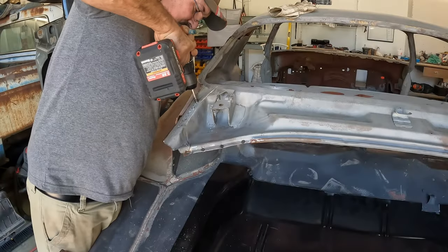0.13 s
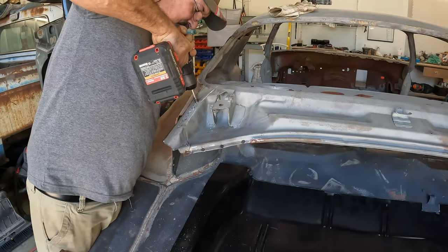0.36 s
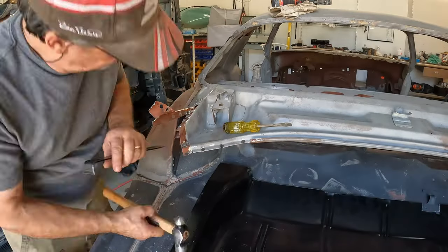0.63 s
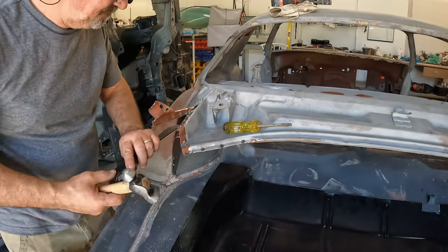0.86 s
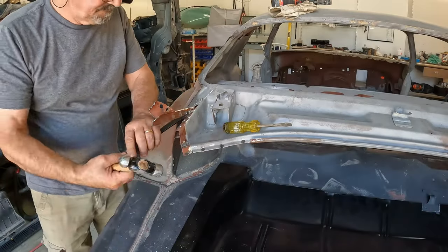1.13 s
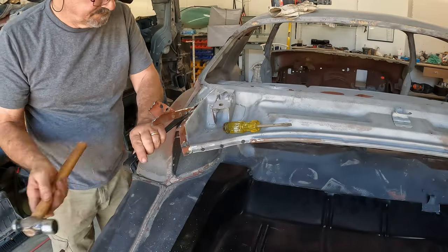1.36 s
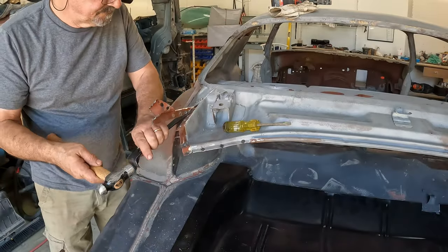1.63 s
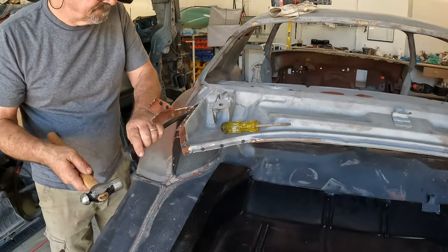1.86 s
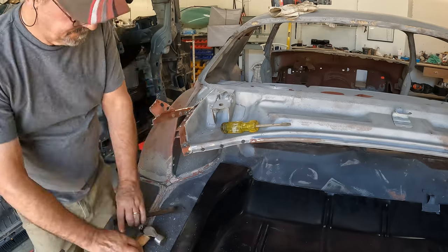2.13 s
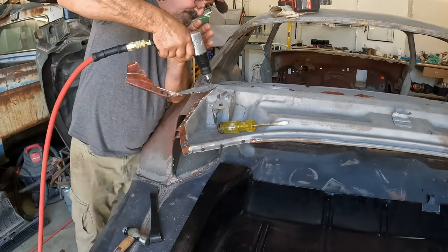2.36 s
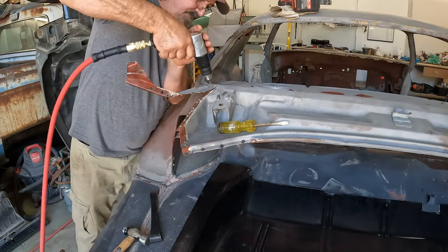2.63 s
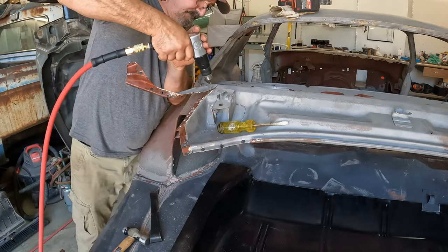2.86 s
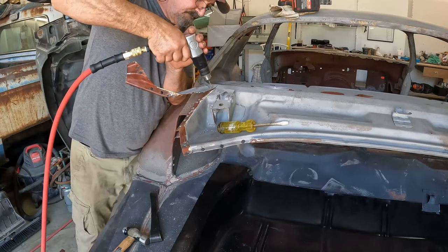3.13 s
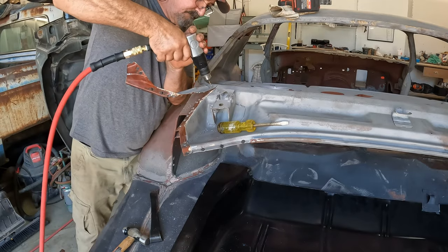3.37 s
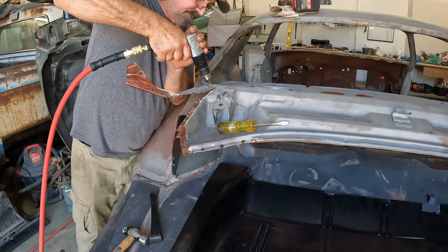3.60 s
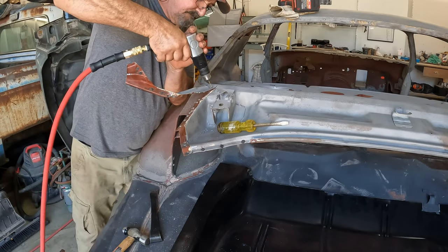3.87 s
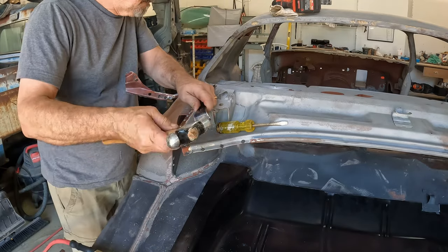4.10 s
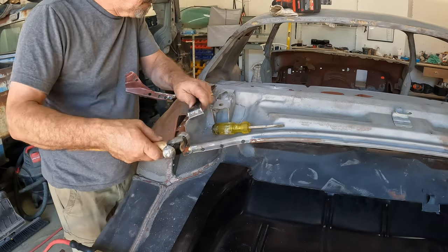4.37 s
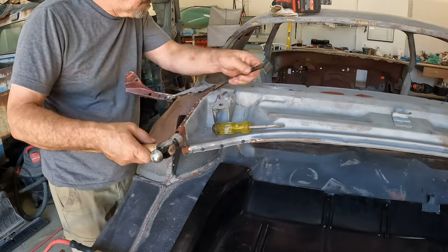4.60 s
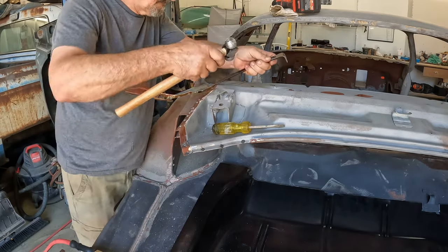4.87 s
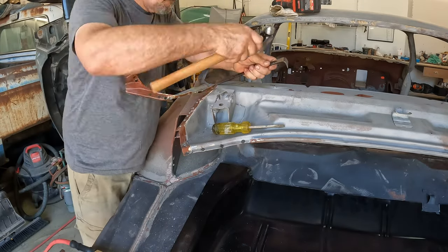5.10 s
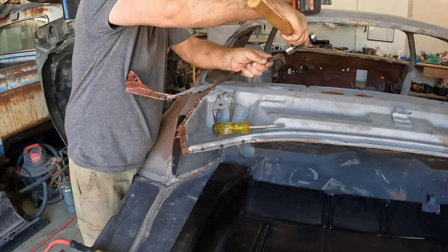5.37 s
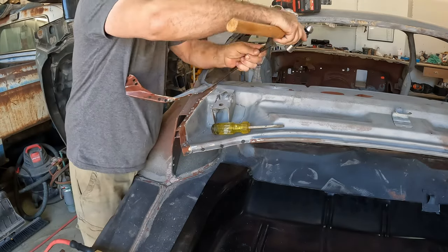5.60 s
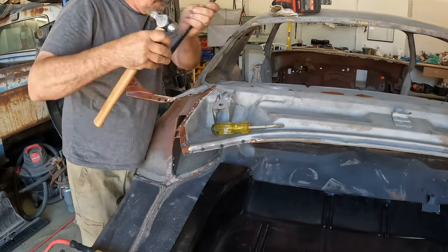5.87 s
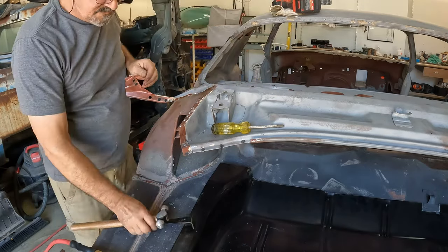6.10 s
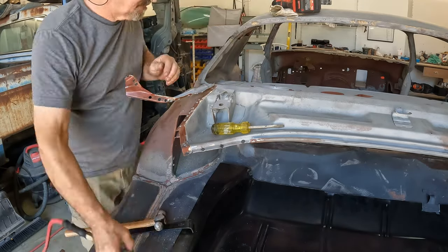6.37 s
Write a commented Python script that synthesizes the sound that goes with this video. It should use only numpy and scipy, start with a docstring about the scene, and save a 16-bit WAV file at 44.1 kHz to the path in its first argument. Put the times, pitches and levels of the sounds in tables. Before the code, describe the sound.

In a home garage, a cordless drill already boring sheet steel whines steadily over a rumbling panel for half a second. It cuts abruptly to irregular hammer blows on a chisel, sharp, clanking and briefly ringing, with small scrapes. An air drill then pops, spins up and whines with rushing exhaust, before the hammer returns in quick runs. Close microphone, nearly mono, hissy background.

```python
"""A cordless drill bores sheet steel: gear whine and shaft tones over a rumbling panel and motor hiss.
Then a hammer drives a chisel into a seam of a bare car body: cracks, dense and strong ringing modes,
clinks, thuds and scrapes. An air drill pops, spins up and whines on vane tones and exhaust rush, and
the hammer returns with quick runs of blows. These four joined passages sit in a garage, over noise that is
hissy behind the hammer, duller behind the air drill; all is near mono, with a faint flickering side."""
import sys
import numpy as np
from scipy import signal
from scipy.fft import rfft, irfft, next_fast_len
from scipy.io import wavfile
from scipy.ndimage import map_coordinates

SR = 44100
rng = np.random.default_rng(int(sys.argv[2]) if len(sys.argv) > 2 else 0)


def invert_db(level):
    """Linear amplitude ratio for a level in decibels (20 dB per decade), elementwise."""
    return 10 ** (np.asarray(level, dtype=float) / 20)


def file_out(sig):
    """Save sig as 16-bit WAV at sys.argv[1]."""
    # one column per channel
    cols = np.atleast_2d(sig).T
    # limit, then scale
    lim = np.clip(cols, -1, 1)
    pcm = np.round(lim * 32767).astype(np.int16)
    wavfile.write(sys.argv[1], SR, pcm)


N = 285768  # length in samples

# Hammer blows: t/s, level/dB, boom/dB, treble/dB, f/Hz that the struck spot favours
BLOWS = [(0.639, -7.5, -3, -7, 1746), (0.659, -14, -8.5, -6.5, 2000), (0.679, -14, -12, -1, 1600),
         (0.781, -15, -8.5, 8.5, 5300), (0.884, -15, -20, -12, 2400), (0.895, -21, -30, -18, 2410),
         (0.953, -22, -16, -3, 2400), (0.999, -34, 6, 0, 1900), (1.045, -40, -15, 0, 1360),
         (1.073, -31, -17.5, 0, 2010), (1.079, -11.5, -6.5, 2, 2436), (1.173, -28, -10, 8, 5100),
         (1.235, -35, -9, -3, 1400), (1.382, -13, -20.5, 4, 2340), (1.469, -8.5, -8, -1.5, 3340),
         (1.609, -10.5, -9.5, -2.5, 1776), (1.693, -9, 1, 0.5, 3240), (1.738, -20, -9, 12, 905),
         (1.907, -7, -3, -2.5, 3200), (1.971, -24, -10, -1.5, 2000), (2.029, -36.5, 1, 3.5, 820),
         (2.06, -24, -21, -9.5, 3240), (2.112, -5.5, -4.5, -16, 976), (2.149, -18, 0.5, -0.5, 1004),
         (2.2, -6, -17, -9.5, 4410), (2.244, -14.5, -12.5, -9.5, 2350), (4.133, -12, 3.5, 1.5, 1715),
         (4.203, -7.5, -4.5, 0.5, 1690), (4.271, -5.5, -7.5, -4.5, 1787), (4.337, -7, -5, -2, 1736),
         (4.835, -19.5, -17, 4, 5100), (4.921, -13.5, -15, -6, 2350), (4.954, -11.5, -24, -16.5, 2350),
         (4.988, -22, -22, 12.5, 5300), (5.024, -17, -21, -3.5, 2745), (5.067, -20.5, -21, 0, 2120),
         (5.091, -12.5, -21, -9.5, 3080), (5.113, -28, -6.5, -7, 3110), (5.149, -40, 6, 9, 644),
         (5.203, -42, -8, 7.5, 733), (5.307, -14.5, -15, 8, 2400), (5.375, -14, -2.5, 8.5, 5250),
         (5.438, -11, -7, 5.5, 2570), (5.488, -13, -3, 6.5, 2500), (5.541, -11.5, -1, 5, 1770),
         (5.592, -7.5, -6, 0, 1740), (5.645, -10, -1, 2, 1700), (5.845, -45, 6.5, 3, 618),
         (6.014, -42, -31, 12.5, 2580), (6.039, -49, 5, -1, 649), (6.063, -38, -17.5, 19.5, 5300),
         (6.153, -14, -3, 6, 5600), (6.179, -9.5, -7.5, -12, 1140), (6.201, -11, -5.5, 2.5, 2310)]
# Strong modes of the panel: f/Hz, relative level/dB, t60/s before each blow's stretch
PANEL_MODES = [(448, -8, .3), (487, -6.5, 0.45), (705, -0.5, 0.4), (909, 2.5, 0.25), (1058, 3.5, 0.28),
               (1280, -17, .25), (1510, -12, 0.18), (1740, -3, .32), (1790, -17, 0.22), (2123, 4.5, 0.21),
               (2377, 1.5, 0.16), (2530, -0.5, 0.18), (2770, -4, 0.2), (3080, -7.5, 0.2), (3350, -16, 0.22),
               (4170, -8, .18), (5400, -3.5, .12)]
# Colour of the sheet's dense small modes: f/Hz, relative level/dB
SHEET_COLOUR = [(150, -42), (350, -29), (600, -1), (1500, 2), (3000, -5), (6000, -8.5), (10000, -9.5),
                (15500, -16), (16500, -32.5)]
# Decay of those dense modes: f/Hz, t60/s before each blow's stretch
SHEET_DECAY = [(200, 0.61), (530, 0.2), (1400, 0.27), (3700, 0.19), (9700, 0.12), (15000, 0.1)]
# Chisel ringing free: t/s, level/dB, f/Hz of the mode the grip leaves loudest
CLINKS = [(1.083, -46, 4500), (1.47, -46, 7200), (1.74, -44, 6480), (2.061, -43.5, 3350),
          (4.99, -46, 10400), (5.089, -42, 3350), (5.205, -54, 10400), (5.644, -54, 6480),
          (5.927, -56, 7200), (6.2, -51, 8800)]
# Modes of the chisel: f/Hz, relative level/dB, t60/s before the clink's shortening
CHISEL_MODES = [(3350, 0, .2), (4500, -3, .2), (6480, -4, .5), (7200, 0, .2), (8800, -5, .3),
                (10400, -3, .25), (12300, -4, .15), (15600, -4, .15)]
# Blows that make the whole body lurch: t/s, level/dB
THUDS = [(0.639, -52), (1.079, -53), (1.382, -56), (1.469, -36), (1.693, -43), (1.907, -46), (2.112, -54),
         (4.133, -44), (4.203, -43), (4.271, -46), (4.337, -48), (5.375, -48), (5.438, -44), (5.488, -46),
         (5.645, -51), (6.153, -56)]
# Steel dragged on steel: start t/s, length/s, level/dB
SCRAPES = [(0.625, .015, -30), (1.13, .04, -38), (4.43, .06, -48), (4.54, .025, -41), (4.66, .07, -31),
           (4.94, .17, -35), (5.97, .045, -50), (6.42, .02, -43)]
# Cordless drill's speed as the bit catches and frees: t/s, shaft f/Hz
DRILL_SPEED = [(0.0, 113.5), (0.066, 116.6), (0.132, 113.8), (0.33, 111.6), (0.382, 113.8), (0.494, 111.4),
               (0.54, 113)]
# Cordless drill's shaft tones: multiple of shaft, level/dB beside the whine
DRILL_ORDERS = [(2, -10), (3, -9), (6, -3.5), (12, -12), (24, -10.5), (30, -20), (96, -29.5), (118, -55)]
# Panel under the drill bit: f/Hz, width/Hz, relative level/dB
DRILL_PANEL = [(215, 64, -0.5), (415, 65, 2.5), (486, 43, 6.5), (573, 72, -7.5), (727, 77, 1.5),
               (1130, 100, -9)]
# Colour of the motor's hiss: f/Hz, relative level/dB per Hz
DRILL_HISS = [(35, -59), (60, -26), (209, -8.5), (551, -4.5), (679, 1), (1210, -16), (1360, -10.5),
              (2470, -15), (3580, -4.5), (3930, -11), (7500, -27.5), (9020, -46), (11100, -38),
              (15000, -96)]
# Air drill's rotor overshoots and sags under load:
# t/s, first vane tone f/Hz at full speed, second and third vane tone level/dB before surge and chatter
AIR_SPEED = [(2.65, 1136, -13, -19), (2.71, 1106, -14, -19), (2.74, 1094, -15, -14), (2.8, 1075, -17, -15),
             (2.9, 1057, -18.5, -14), (2.96, 1046, -18, -13), (3.04, 1035, -18, -15.5),
             (3.27, 1021, -21, -16), (3.57, 1010, -23, -16), (3.75, 1010, -21, -18),
             (3.8, 1020, -21, -15.5), (4.075, 1023, -17.5, -17)]
# Air drill's shaft tones: multiple of shaft, level/dB beside their shared level
AIR_ORDERS = [(1, -24.5), (2.5, -20), (3.5, -17.5), (7, -14.5), (11, -11), (12, -34), (13, -22), (14, -19),
              (16, -10), (18, -30), (19, -14), (20, -7.5), (25, -14.5), (27, -17), (29, -13), (55, -34)]
# Panel under the air drill: f/Hz, width/Hz, relative level/dB
AIR_PANEL = [(102.6, 8.3, -12.5), (238, 74, -14), (500, 49, 0), (615, 194, -2.5), (1356, 123, -6)]
# Colour of the exhaust rush: f/Hz, relative level/dB per Hz
EXHAUST_COLOUR = [(35, -72), (60, -39), (438, -16.5), (551, -21), (938, -16), (1030, -5), (1600, -18.5),
                  (2060, -13.5), (2470, -9.5), (3120, -4.5), (3420, -12), (5950, -14.5), (8820, -29),
                  (11400, -26.5), (15000, -60.5)]
# Colour of the garage noise behind the hammer: f/Hz, relative level/dB per Hz
GARAGE_COLOUR = [(35, -45), (60, -30.5), (202, -8.5), (1060, 8.5), (1220, 3), (1910, 2), (2900, -5.5),
                 (3190, -0.5), (3420, -4), (4320, -9), (16000, -15)]
# Loudness of that garage noise: t/s, level/dB
GARAGE_LEVEL = [(.55, -46.5), (1.35, -45), (1.9, -49), (2.44, -47), (4.5, -48), (5.3, -47.5), (5.8, -54),
                (6.12, -52), (6.48, -46)]
# Colour of the duller noise behind the air drill: f/Hz, relative level/dB per Hz
DULL_COLOUR = [(18, -50), (30, -44), (82, -17), (334, 5), (414, -20.5), (592, -4), (652, -19), (4840, -31),
               (9000, -72), (11700, -101), (19800, -120)]
# Faint residue in the side: f/Hz, level/dB beside mid before a small lift and quick flicker
SIDE_RESIDUE = [(40, -26), (80, -18), (150, -27), (380, -29), (950, -36), (2380, -41), (5980, -26),
                (15000, -17)]

DRILL_END_S, AIR_SCENE_S, AIR_START_S, AIR_STOP_S = 0.541, 2.443, 2.584, 4.077


def hammer():
    """Blows on chisel and panel, loose chisel rings and body lurches, each a decaying sound set in time."""
    out, t = np.zeros(N + SR), np.arange(SR // 2) / SR
    comb = ripple(0.0099)  # fine peaks of the sheet, alike for all blows
    for s, db, boom_db, treble_db, spot_hz in BLOWS:
        stretch = max(1.47 + .02 * db + .018 * boom_db, .1)  # harder and deeper blows ring longer
        place(out, s, invert_db(db) * blow(boom_db, treble_db, stretch, spot_hz, comb))
    for s, db, free_hz in CLINKS:
        modes = [(f, level + 9 * (abs(f / free_hz - 1) < .06), t60) for f, level, t60 in CHISEL_MODES]
        place(out, s, invert_db(db) * ring(modes, 0.6, t))
    bass_cut = signal.butter(4, 220, "high", fs=SR, output="sos")  # the blows carry no deep bass
    out = signal.sosfilt(bass_cut, out)
    lurch = np.sin(2 * np.pi * 60 * t) * np.exp(-t / .009)
    for s, db in THUDS:
        place(out, s, invert_db(db) * lurch)
    wall = np.pad(out, (round(.014 * SR), 0))  # the nearest wall answers once
    return out[:N] + invert_db(-11) * wall[:N]


def blow(boom_db, treble_db, stretch, spot_hz, comb):
    """Contact click, crack, dense modes dying band by band, and strong modes loudest near the spot's pitch."""
    size = SR // 2

    def colour(f):
        spot_db = 7 * np.exp(-(np.log(f / spot_hz + 1e-9) / 0.064) ** 2)
        return along([(900, boom_db), (3000, 0), (9000, treble_db)], f) + spot_db

    hz, t, z = signal.stft(rng.standard_normal(size), SR, nperseg=128)
    fade_db = -60 * np.maximum(t - .01, 0) / (stretch * along(SHEET_DECAY, hz)[:, None])
    crack = 1 + along([(2000, 1.3), (12000, 3.85)], hz)[:, None] * np.exp(-t / 0.0021)
    dense = signal.istft(z * invert_db(fade_db) * crack, SR, nperseg=128)[1][:size]
    hz = np.fft.rfftfreq(2 * size, 1 / SR)
    own = ripple(0.0074)  # each blow wakes other small modes
    dense = causal(dense, along(SHEET_COLOUR, hz) + colour(hz) + 2.2 * comb + 2.09 * own)

    t = np.arange(size) / SR
    spot_db = along([(1700, 0), (2400, 2), (3200, -2), (5000, -5)], spot_hz)
    modes = PANEL_MODES + [(spot_hz, spot_db, along(SHEET_DECAY, spot_hz))]
    strong = ring([(f, db + 0.96 * colour(f), t60) for f, db, t60 in modes], stretch, t)
    strong = invert_db(-20) * strong * (1 - np.exp(-t / 0.0013))
    click = np.diff(rng.standard_normal(size + 1)) * np.exp(-t / .0005)  # the steel-on-steel contact
    return (dense + strong) * (1 - np.exp(-t / 0.001)) + invert_db(treble_db + 4) * click


def scrapes():
    """Steel dragged on steel: a hail of small catches roughens hiss coloured by the sheet."""
    level = sum(invert_db(db) * swell(s, s + length, .007, .018) for s, length, db in SCRAPES)
    catches = (rng.random(N) < 600 / SR) * rng.standard_normal(N)  # about 600 a second
    grit = .9 + np.abs(signal.lfilter([1], [1, -.99], catches))  # each catch dies in a few ms
    hz = np.fft.rfftfreq(SR, 1 / SR)
    peaks_db = 3 * ripple(.006)

    def colour(f):
        bright_db = along([(1000, 1), (2500, 10)], f)
        return invert_db(along(SHEET_COLOUR, f) + bright_db + np.interp(f, hz, peaks_db))

    return level * unit(grit * noise(colour))


def drill():
    """Meshing gear teeth whine with the shaft's multiples, over the cut panel's rumble and motor hiss."""
    shaft_hz, = curves(DRILL_SPEED)
    whine = tones(shaft_hz, [(32, 0)], unsteady_db=2.5, jitter=.5)  # gear of 32 teeth
    orders = tones(shaft_hz, DRILL_ORDERS, unsteady_db=2.5, jitter=0.65)
    cutting = invert_db(-23.5 + 2 * wobble(15) + 0.85 * wobble(70)) * noise(resonant(DRILL_PANEL))
    hiss = invert_db(-19.5) * noise(lambda hz: dip(hz) * invert_db(along(DRILL_HISS, hz)))
    return (invert_db(-21.5) * (whine + orders) + cutting + hiss) * span(-1, DRILL_END_S)


def air_drill():
    """A vane motor spins up with a pop; its turning sets vane tones, shaft orders and exhaust pulses."""
    vane_hz, second_db, third_db = curves(AIR_SPEED)
    since = np.maximum(np.arange(N) / SR - AIR_START_S, 0)
    speed = 1 - np.exp(-since / .016)  # the rotor reaches speed in a few turns
    vanes = 5
    shaft_hz = vane_hz / vanes * speed
    surge = np.exp(-since / .025)  # first surge of air favours the third tone and shakes the panel

    # the bit chatters for a moment: upper vane tones sink, the third one late; cut and exhaust swell
    chatter_s, chatter_end_s, edge_s, third_lags_s = 3.005, 3.15, .014, .045
    chatter = swell(chatter_s, chatter_end_s, edge_s, edge_s / 2)
    late = swell(chatter_s + third_lags_s, chatter_end_s, edge_s, edge_s / 2)

    second_db = second_db - 22 * surge - 12 * chatter
    third_db = third_db + 19 * surge - 8 * late + .8 * wobble(14)
    vane_tones = sum(invert_db(db) * tones(shaft_hz, [(k * vanes, 0)], unsteady_db=.8, jitter=.15)
                     for k, db in ((1, -24.5), (2, second_db), (3, third_db)))
    orders = invert_db(-23.5) * tones(shaft_hz, AIR_ORDERS, unsteady_db=3.0, jitter=0.17)

    # one panel mode wakes near the vane tone
    sing = invert_db(-27.5) * swell(3.37, AIR_STOP_S, .12, 1) * noise(resonant([(1086, 6, 0)]))

    puffs = 1 + 0.1 * np.sin(2 * np.pi * np.cumsum(shaft_hz) / SR)  # exhaust pulses once a turn
    exhaust_db = -19 + 2 * chatter + .8 * wobble(20) + 1.3 * np.exp(-since / 0.026)
    rush = noise(lambda hz: dip(hz) * invert_db(along(EXHAUST_COLOUR, hz)))
    exhaust = invert_db(exhaust_db) * puffs * rush

    # the panel's rumble weakens, by 6.5 dB a second, as the hole deepens
    cutting_db = -24.5 + 13 * surge - 6.5 * since + 8 * chatter + 2.5 * wobble(25) + 0.81 * wobble(60)
    cutting = invert_db(cutting_db) * noise(resonant(AIR_PANEL))

    # first rush of pressure thumps the panel, its pitch falling to 210 Hz
    pop_turns = 210 * since + 3 * (1 - np.exp(-since / .006)) / np.pi
    pop_level = invert_db(-8.5 - 60 * since / 0.07) * (1 - np.exp(-since / 0.0017))
    pop = pop_level * np.sin(2 * np.pi * pop_turns)

    # air leaks as the trigger opens, swelling until the start
    leak_level = invert_db(-29) * swell(AIR_START_S, AIR_START_S, .012, .003) * span(2.55, AIR_STOP_S)
    leak = leak_level * noise(resonant([(2870, 1500, 8), (6000, 3000, 0)]))

    running = speed ** 2 * (vane_tones + orders) + sing + exhaust + cutting + pop
    return running * span(AIR_START_S, AIR_STOP_S) + leak


def garage_noise():
    """Hissy shaped noise behind the hammer, its level drifting and wavering."""
    level = invert_db(curves(GARAGE_LEVEL)[0] + 0.41 * wobble(12))
    return level * noise(lambda hz: invert_db(along(GARAGE_COLOUR, hz))) * span(DRILL_END_S, 9)


def dull_noise():
    """Steady shaped noise with little treble behind the air drill."""
    return invert_db(-48.5) * noise(lambda hz: invert_db(along(DULL_COLOUR, hz)))


def add_side_residue(mid):
    """Faint flickering side: the mid with scattered phases, added left and subtracted right."""
    hz, t, z = signal.stft(mid, SR, nperseg=256)
    scatter = np.exp(2j * np.pi * rng.random(z.shape))
    side_gain = invert_db(along(SIDE_RESIDUE, hz) + 0.5)[:, None]
    side = signal.istft(z * scatter * side_gain, SR, nperseg=256)[1][:N]
    side = side * invert_db(5 * wobble(25.03))  # its level flickers
    return np.array([mid + side, mid - side])


def tones(shaft_hz, orders, unsteady_db, jitter):
    """Multiples of a turning shaft, each wavering in strength and phase (jitter in radians)."""
    turn = 2 * np.pi * np.cumsum(shaft_hz) / SR
    return sum(np.sqrt(2) * invert_db(db + unsteady_db * wobble(40)) * np.sin(k * turn + jitter * wobble(60))
               for k, db in orders)


def ring(modes, stretch, t):
    """Decaying sines, the modes of a struck thing, at slightly new strengths and pitches each time."""
    hz, db, t60 = np.transpose(modes)[:, :, None]
    luck = rng.standard_normal((2, len(modes), 1))
    level = invert_db(db + 3 * luck[0] - 60 * t / (t60 * stretch))
    return np.sum(level * np.sin(2 * np.pi * hz * (1 + .004 * luck[1]) * t), axis=0)


def noise(response):
    """Noise of rms 1 coloured by a response of frequency."""
    m = next_fast_len(N)
    return unit(irfft(rfft(rng.standard_normal(m)) * response(np.fft.rfftfreq(m, 1 / SR)), m)[:N])


def resonant(peaks):
    """Response of a row of resonances with alternating signs."""
    def response(f):
        return sum((-1) ** k * invert_db(db) * 1j * f * width / (centre * centre - f * f + 1j * f * width)
                   for k, (centre, width, db) in enumerate(peaks))
    return response


def causal(x, gain_db):
    """x through a minimum-phase filter given in dB on the grid of an FFT twice as long."""
    cepstrum = irfft(gain_db * np.log(10) / 20)
    half = len(cepstrum) // 2
    cepstrum[1:half] *= 2
    cepstrum[half + 1:] = 0
    return irfft(rfft(x, 2 * half) * np.exp(rfft(cepstrum)))[:len(x)]


def ripple(ring_s):
    """Random fine peaks over frequency, rms 1, as of many small modes that ring for about ring_s."""
    t = np.arange(SR) / SR
    return unit(rfft(rng.standard_normal(SR) * np.exp(-(t / ring_s) ** 2)).real)


def dip(hz):
    """The narrow gap near 9 kHz in both drills' rush of noise."""
    return invert_db(-14 * np.exp(-((hz - 9050) / 250) ** 2))


def wobble(rate):
    """A smooth random curve, rate knots a second."""
    return map_coordinates(rng.standard_normal(int(N * rate / SR) + 4), [np.arange(N) * rate / SR])


def swell(start, stop, rise_s, fall_s):
    """1 between two moments, growing exponentially before and dying after."""
    t = np.arange(N) / SR
    return np.exp(np.minimum(0, np.minimum((t - start) / rise_s, (stop - t) / fall_s)))


def span(start, stop):
    """1 between two moments, with edges of a millisecond."""
    t = np.arange(N) / SR
    return np.clip(1000 * np.minimum(t - start, stop - t), 0, 1)


def curves(rows):
    """One value per sample for each column after the time."""
    s, *cols = np.transpose(rows)
    return [np.interp(np.arange(N) / SR, s, c) for c in cols]


def along(points, hz):
    """(Hz, value) points read on a log axis."""
    f, v = np.transpose(points)
    return np.interp(np.log(hz + 1), np.log(f + 1), v)


def unit(x):
    """Scaled to rms 1."""
    return x / np.sqrt(np.mean(x ** 2) + 1e-20)


def place(out, s, sound):
    """Adds a sound into out, starting at s seconds."""
    out[round(s * SR):][:len(sound)] += sound


def scene():
    """Drill, then hammer over garage noise, broken by the air drill over duller noise, near mono."""
    airy = span(AIR_SCENE_S, AIR_STOP_S)
    hammering = hammer() + scrapes() + garage_noise()
    mid = drill() + air_drill() + hammering * (1 - airy) + dull_noise() * airy
    return add_side_residue(mid)


def top_cut(x):
    """Nothing passes above the cut-off."""
    return signal.sosfilt(signal.butter(12, 16820, fs=SR, output="sos"), x)


def record(dry):
    """Loud peaks are rounded off, then deep bass and top treble are dropped."""
    soft = dry / (1 + np.abs(dry) ** 6) ** (1 / 6)
    thin = signal.sosfilt(signal.butter(3, 70, "high", fs=SR, output="sos"), soft)
    dull = signal.sosfilt(signal.cheby1(8, .5, 15900, fs=SR, output="sos"), thin)
    return top_cut(dull)


dry = scene()
out = record(dry)
file_out(out)
```